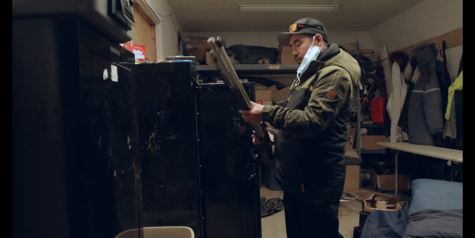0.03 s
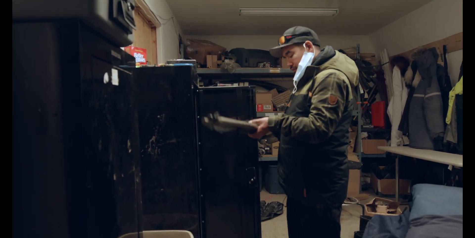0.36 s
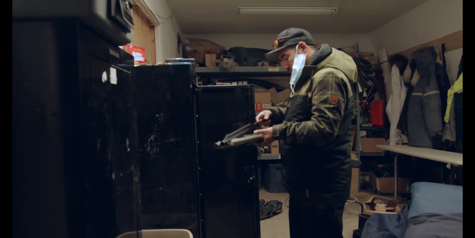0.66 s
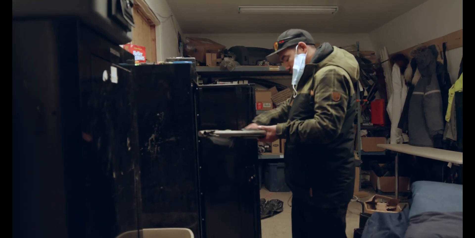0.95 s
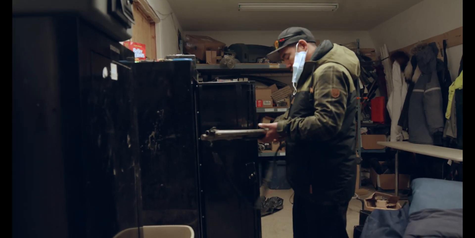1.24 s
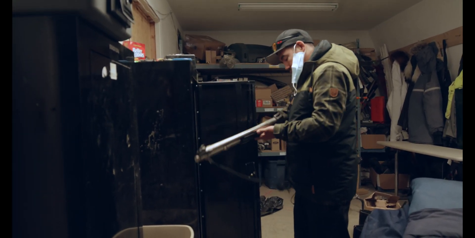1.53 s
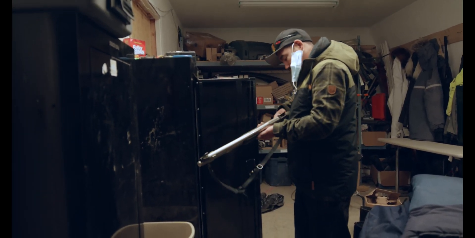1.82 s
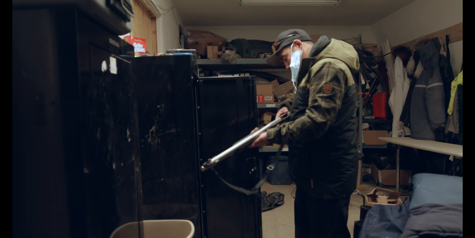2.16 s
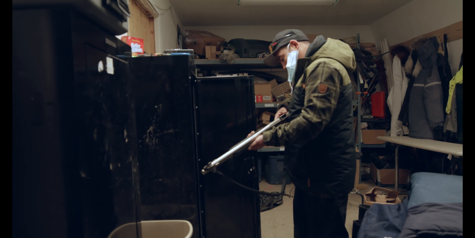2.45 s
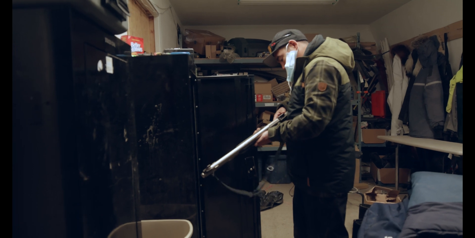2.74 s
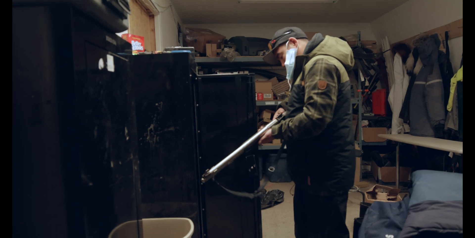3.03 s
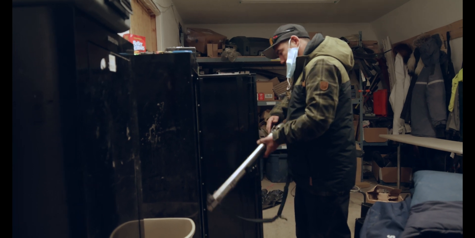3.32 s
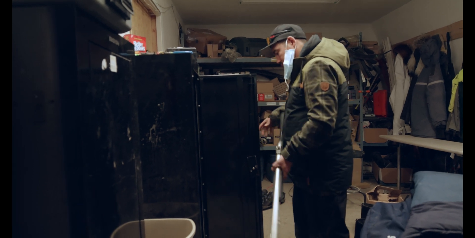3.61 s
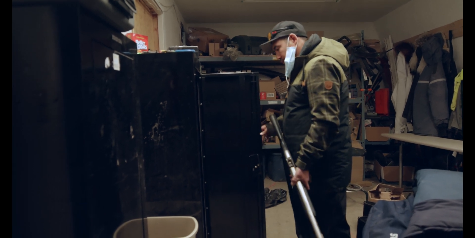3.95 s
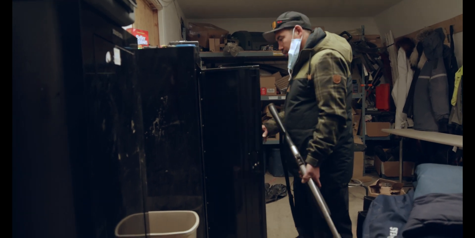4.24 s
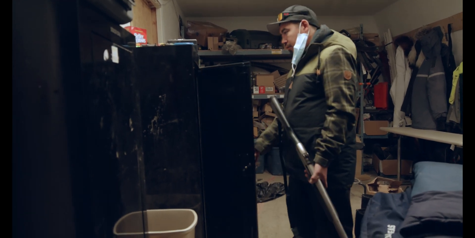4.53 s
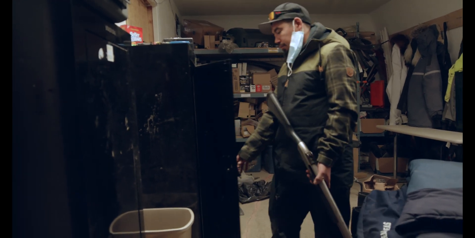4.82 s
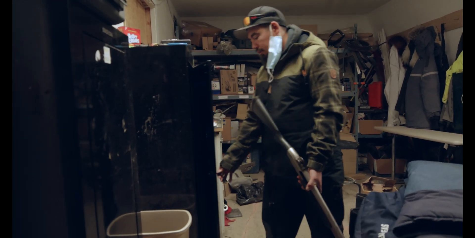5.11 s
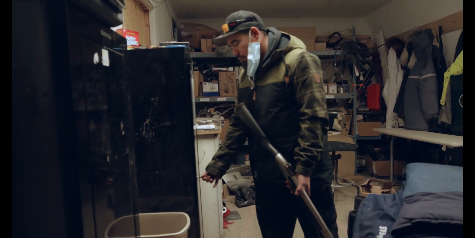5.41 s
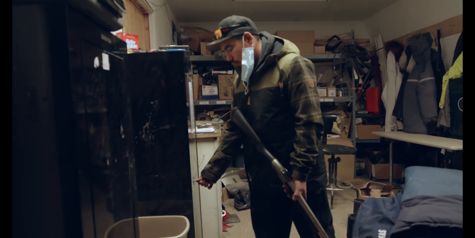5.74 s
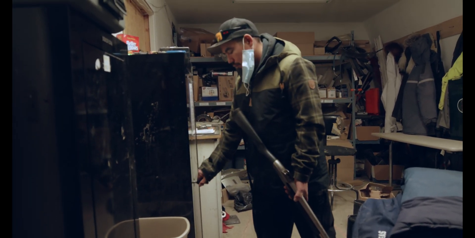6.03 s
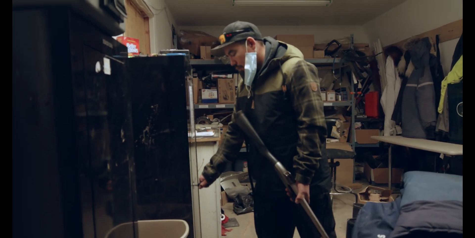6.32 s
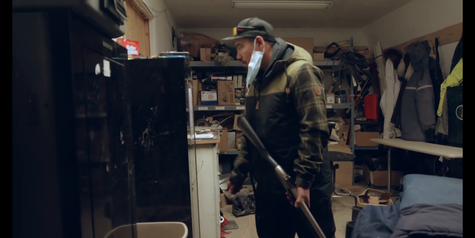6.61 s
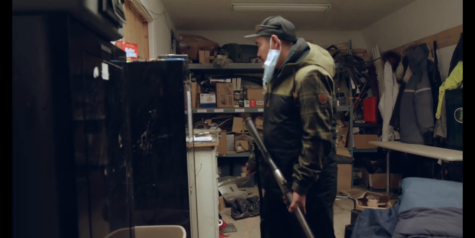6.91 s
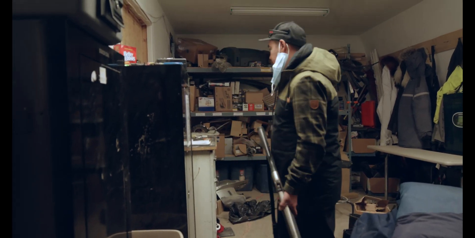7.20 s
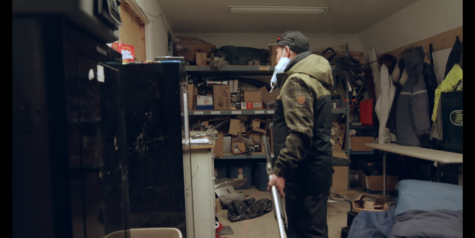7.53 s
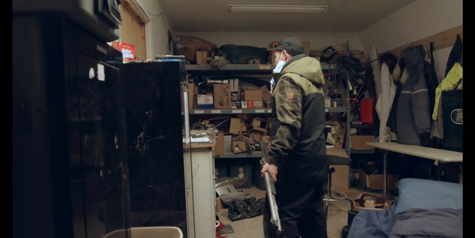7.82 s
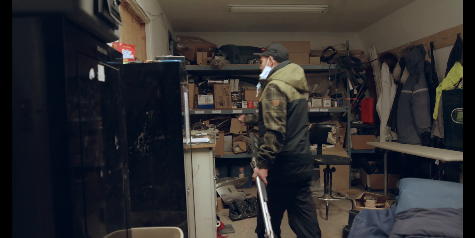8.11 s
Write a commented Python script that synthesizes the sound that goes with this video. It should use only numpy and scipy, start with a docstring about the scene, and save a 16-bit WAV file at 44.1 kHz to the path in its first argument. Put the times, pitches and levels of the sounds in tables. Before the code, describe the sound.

A long gun's action slides and clacks sharply, then a steel safe door rasps and booms over a low machine hum.

```python
"""Machines hum in a small storeroom. A man's jacket rustles, and a long gun taps and knocks as he shifts it.
From 2 s he works the action: steel parts slide, clack against their stops and ring the barrel.
Near 5 s the latch of a steel safe rasps back; the door shudders and booms, its bolts clink, a hinge squeaks.
A few last rustles and knocks follow. One microphone feeds the left channel and overloads on the
hardest clacks."""
import sys
import numpy as np
from scipy import signal
from scipy.fft import rfft, irfft
from scipy.io import wavfile

SR = 44100
rng = np.random.default_rng(int(sys.argv[2]) if len(sys.argv) > 2 else 0)


def wrap_up_sound(samples):
    """Save the sound to the file named by the first command line argument, as 16-bit audio."""
    columns = np.atleast_2d(samples).T
    # keep every value between -1 and 1, then stretch to whole-number steps
    tamed = np.clip(columns, -1, 1)
    steps = np.round(tamed * 32767).astype(np.int16)
    wavfile.write(sys.argv[1], SR, steps)


N = 364266
TIME = np.arange(N) / SR


def from_db(db):
    """Decibels to gain."""
    return 10 ** (np.asarray(db) / 20)


def at_hz(points, hz):
    """Read a curve on a log-frequency axis."""
    f, value = np.transpose(points)
    return np.interp(np.log(np.maximum(hz, 1)), np.log(f), value)


def drift(rate_hz):
    """Random modulation with a spread of about 1."""
    knots = rng.standard_normal(size=4000)
    return np.interp(TIME * rate_hz, np.arange(len(knots)), knots)


def lowpass(x, hz, order=2):
    """Butterworth low-pass."""
    return signal.sosfilt(signal.butter(order, min(hz, .45 * SR), fs=SR, output="sos"), x)


def shaped_click(eq, size=8192):
    """The tightest click with this EQ curve (minimum phase)."""
    log_gain = np.log(from_db(at_hz(eq, np.arange(size // 2 + 1) * SR / size)))
    cepstrum = irfft(log_gain)[:size // 2]
    cepstrum[1:] *= 2
    return irfft(np.exp(rfft(cepstrum, size)))


def coloured(x, eq):
    """Put an EQ curve on a steady sound; rms 1."""
    gain = from_db(at_hz(eq, np.arange(N // 2 + 1) * SR / N))
    shaped = irfft(rfft(x) * gain, N)
    return shaped / np.sqrt(np.mean(shaped ** 2) + 1e-20)


def struck(contacts, modes, eq, grain_db, tick_db, mode_spread_db=2.5):
    """Each contact is a dying burst of tiny impacts that rings the body's modes in a mix of its own."""
    t = TIME[:SR // 2]
    out, click = np.zeros(N + 2 * SR), shaped_click(eq)
    rings = np.zeros((len(modes), len(t)))
    for ring, (hz, mode_db, t60) in zip(rings, modes):
        ring[:] = np.sin(2 * np.pi * hz * t) * from_db(-60 * t / t60)
        ring *= from_db(mode_db) / np.linalg.norm(ring)
    for s, level_db, decay_ms, bright_hz, bass_db in contacts:
        envelope = np.exp(-t[:SR // 5] * 1000 / decay_ms)
        white, grain_size, grit = rng.standard_normal((3, len(envelope)))
        grains = envelope * from_db(grain_db * grain_size)
        chatter = grains * white
        # a heavy part pushes more bass, a soft contact gives less treble, yet some grit always ticks
        burst = chatter + (from_db(bass_db) - 1) * lowpass(chatter, 1000, order=1)
        burst = lowpass(burst, bright_hz) + from_db(tick_db) * grains * grit
        body = from_db(mode_spread_db * rng.standard_normal(len(modes))) @ rings
        body[:len(click)] += click / np.linalg.norm(click)
        hit = signal.fftconvolve(burst, body)
        at = int(s * SR)
        out[at:at + len(hit)] += from_db(level_db) * hit * np.linalg.norm(envelope) / np.linalg.norm(hit)
    return out[:N]


# reverb time by band, before scaling by linger: f/Hz, t60/s
ROOM_DECAY = [(50, 0.56), (200, 0.33), (600, 0.35), (2000, 0.29), (6000, 0.32), (11000, 0.23),
              (16000, 0.16)]


def storeroom(x, wet_db, linger, count=3):
    """Dense reflections off walls and shelves; the treble dies first, the pattern shifts as he moves."""
    t, hz = TIME[:SR], np.arange(SR // 2 + 1)
    white = rfft(rng.standard_normal((count, SR)))
    edges = np.geomspace(20, SR / 2, 14)
    tails = 0
    for low, high in zip(edges, edges[1:]):
        t60 = linger * at_hz(ROOM_DECAY, np.sqrt(low * high))
        band = irfft(white * ((hz >= low) & (hz < high)), SR)
        tails = tails + band * from_db(-60 * t / t60)
    tails *= np.clip((t - .003) / .0011, 0, 1)   # the nearest surfaces answer after a few ms
    tails /= np.linalg.norm(tails, axis=1, keepdims=True)
    sends = np.array([drift(20) for tail in tails])
    sends /= np.linalg.norm(sends, axis=0)
    wet = signal.fftconvolve(x * sends, tails, axes=1)[:, :N].sum(axis=0)
    return x + from_db(wet_db) * wet


# motor harmonics: multiple of the turning rate, relative level/dB
MOTOR_HARMONICS = [(2, -6), (3, -11.5), (4, 0.5)]
# steady machine hum: f/Hz, level/dB
HUM_TONES = [(73.5, -65), (118, -65), (156, -60), (175.5, -51), (240, -54), (273.5, -64), (292, -66),
             (360, -68)]
# ventilation and distant rumble: f/Hz, relative level/dB
AIR_EQ = [(10, 3.5), (19, -4.5), (32, 10), (48, -1), (70, -25.5), (110, -16), (170, 3), (280, -2),
          (450, -4.5), (900, -8), (2000, -22), (5000, -29.5), (10000, -38.5), (15500, -50.5)]


def machines():
    """The bed: a motor slowly gathers speed and fades, wavering with a steady hum over moving air."""
    turns_per_s = (32.7 + .25 * TIME) * (1 + .02 * drift(3))
    turns = np.cumsum(turns_per_s) / SR
    motor_db = -51 - TIME   # fades 1 dB a second
    motor = [(multiple * turns, motor_db + db) for multiple, db in MOTOR_HARMONICS]
    hum = [(hz * TIME, db) for hz, db in HUM_TONES]
    out = from_db(-49.5) * coloured(rng.standard_normal(N), AIR_EQ)
    for cycles, level_db in motor + hum:
        phase = cycles + rng.random() + .04 * drift(3)
        out += np.sqrt(2) * from_db(level_db + 1.9 * drift(7.1)) * np.sin(2 * np.pi * phase)
    return out


# arm moves in the jacket: t/s at the quickest, swish level/dB before makeup gain, half length/s
ARM_MOVES = [(0.235, -61.5, 0.13), (.6, -64.5, 0.092), (1.566, -60, 0.13), (1.74, -67, 0.024),
             (3.247, -60, .05), (3.494, -60.5, 0.17), (4.087, -64, 0.11), (4.39, -66.5, 0.06),
             (4.766, -57.5, 0.035), (5.325, -65.5, 0.34), (6.717, -65, 0.14), (6.976, -65.5, 0.086),
             (7.556, -56, 0.05), (7.757, -62.5, 0.24), (8.176, -52, 0.064)]
# the cloth's dull rub: f/Hz, relative level/dB
RUB_EQ = [(100, -13), (400, 12), (1000, 5.5), (2200, 3.5), (3500, -7), (6000, -26), (15500, -76.5)]
# its airy swish: f/Hz, relative level/dB
SWISH_EQ = [(500, -44.5), (2000, 0.5), (3800, 6.5), (6500, 2), (8500, -2), (11000, -8.5), (15500, -18)]


def jacket(limit_db=-51, makeup_db=3.5):
    """Cloth rubs and swishes in fine uneven grains; each arm move swells over a slight resting stir."""
    move_power = sum(from_db(level_db) ** 2 * np.exp(-((TIME - s) / half_s) ** 2)
                     for s, level_db, half_s in ARM_MOVES)
    out, creases = 0, drift(73)
    for eq, resting_db, move_db in [(RUB_EQ, -62.5, 3), (SWISH_EQ, -75, 0)]:
        level_db = 10 * np.log10(from_db(resting_db) ** 2 + from_db(move_db) ** 2 * move_power)
        grains = rng.standard_normal(N) * from_db(3.2 * rng.standard_normal(N) + 1.45 * creases)
        out = out + from_db(np.minimum(level_db, limit_db) + makeup_db) * coloured(grains, eq)
    return out


# light taps of hand and sling on the steel: t/s, level/dB, chatter decay/ms
TAPS = [(0.147, -49, 16), (.290, -45.5, 5.4), (4.856, -38, 27), (7.314, -45, 2.8)]
# tone of the taps: f/Hz, relative level/dB
TAP_EQ = [(100, -8), (1200, -11.5), (1900, -7), (2350, -1.5), (2900, -16), (6000, -22), (15500, -31)]
# knocks of the stock as the gun is shifted, and one dull rub of the jacket near 4.65 s: t/s, level/dB, chatter
# decay/ms, high cut/Hz
STOCK_KNOCKS = [(0.895, -42, 3, 8000), (0.958, -43, 20, 5000), (.968, -31.5, 36, 6100),
                (1.030, -42.5, 99, 3000), (3.536, -43.5, 15, 1080), (4.651, -46, 75, 1310),
                (8.061, -38, 4.5, 7950), (8.118, -40.5, 21, 890), (8.244, -33.5, 3.4, 6100)]
# tone of the knocks: f/Hz, relative level/dB
KNOCK_EQ = [(15, -12), (80, 3.5), (180, 1.5), (350, 0), (650, -2.5), (1200, 1), (1800, -2.5), (2500, 0),
            (4000, -6.5), (7500, -10), (15500, -25)]


def handling(tap_bright_hz=3150, tap_bass_db=8, knock_bass_db=3.5):
    """Small damped taps and knocks on the gun, with broad resonances only."""
    tap_contacts = [(*tap, tap_bright_hz, tap_bass_db) for tap in TAPS]
    knock_contacts = [(*knock, knock_bass_db) for knock in STOCK_KNOCKS]
    taps = struck(tap_contacts, [], TAP_EQ, grain_db=-3, tick_db=-7)
    knocks = struck(knock_contacts, [], KNOCK_EQ, grain_db=4, tick_db=-17)
    return storeroom(taps + knocks, wet_db=-2.5, linger=1.26)


# parts of the action hit their stops: t/s, level/dB, chatter decay/ms, high cut/Hz
ACTION_CLACKS = [(2.091, -48.5, 11, 9200), (2.119, -42.5, 22, 5000), (2.1345, -28.5, 11, 10800),
                 (2.147, -12, 3.2, 11800), (2.160, -23, 9.2, 12000), (2.208, -15.5, 9.3, 9200),
                 (2.2227, -14.5, 10.7, 9100), (2.259, -13.5, 10.3, 12000), (2.265, -9, 6.2, 16000),
                 (2.563, -32.5, 4.3, 8000), (2.566, -25.5, 4.8, 11200), (2.604, -30, 12.3, 6470),
                 (2.6433, -22, 7.5, 12000), (2.6628, -15.5, 5.1, 7460), (2.683, -17, 4.6, 5000),
                 (2.690, -19.5, 4.8, 10100), (2.952, -15, 5.3, 4940), (3.003, -12.5, 5.5, 11000),
                 (3.0118, -2.5, 8.8, 14800)]
# ring of barrel and receiver: f/Hz, level/dB (energy against the bare click), t60/s
GUN_MODES = [(1260, -20.5, 0.053), (1570, -20, 0.19), (1864, -21.5, 0.11), (2320, -20, .015),
             (3065, -30, 0.02), (3560, -33.5, 0.033), (4350, -25, 0.056), (5470, -41.5, 0.12),
             (6570, -18.5, 0.036), (9560, -27, 0.063), (12000, -34, .13)]
# tone of the clacks: f/Hz, relative level/dB
GUN_EQ = [(20, -20), (70, -29), (170, -24), (340, -12), (700, -4), (1100, -6), (1800, 3), (3800, 3.5),
          (5500, -2.5), (8000, -5), (11000, -7.5), (15500, -13.5)]
# the closing action jolts the stock: t/s, peak level/dB, half length/s
STOCK_JOLTS = [(3.0155, -21, .0015)]


def gun_action(barrel_hz=452, barrel_db=-18, barrel_t60=.75):
    """Steel parts snap together up close; a jolt pushes out a low pulse and sets the barrel humming."""
    clacks, slides = [], []
    for s, level_db, decay_ms, bright_hz in ACTION_CLACKS:
        bass_db = 4.5 - 3.5 * max(11 - decay_ms, 0)   # heavier parts chatter longer and push more bass
        clacks.append((s, level_db, decay_ms, bright_hz, bass_db))
        if level_db > -20:   # a hard-driven part slides softly just before its stop
            slides.append((s - .015, level_db - 22.5, 10, 6500, -9.5))
    sound = struck(clacks + slides, GUN_MODES, GUN_EQ, grain_db=2, tick_db=-13)
    barrel = np.zeros(N)
    for s, peak_db, half_s in STOCK_JOLTS:
        place = np.clip((TIME - s) / half_s, -6, 6)
        sound += from_db(peak_db) * (1 - place ** 2) * np.exp(-place ** 2)
        age = np.maximum(TIME - s, 0)
        ring_db = peak_db + barrel_db - 60 * age / barrel_t60
        barrel += from_db(ring_db) * np.sin(2 * np.pi * barrel_hz * age)
    return barrel + storeroom(sound, wet_db=-8, linger=.88)


# ring of the latch: f/Hz, level/dB (energy against the bare click), t60/s
LATCH_MODES = [(1730, -16, 0.099), (2046, -19, .25), (2400, -21, 0.059)]
# tone of the rasp: f/Hz, relative level/dB
LATCH_EQ = [(60, -33), (150, 2.5), (330, -1), (700, -3.5), (1000, -6.5), (1900, -5), (3800, -10),
            (6000, -14.5), (10000, -21.5), (15500, -24)]


def latch(start_s=4.939, length_s=.09, decay_ms=13.5, bright_hz=6200, bass_db=-2):
    """The bolts rasp back in a quick run of slips: a soft one, then even ones at widening gaps."""
    times = start_s + length_s * np.linspace(0, 1, 7) ** 1.3
    slips = [(s, -28.5 if k else -33, decay_ms, bright_hz, bass_db) for k, s in enumerate(times)]
    rasp = struck(slips, LATCH_MODES, LATCH_EQ, grain_db=6, tick_db=-19)
    return storeroom(rasp, wet_db=-5, linger=.89)


# the door shudders: t/s, first level/dB, swell/dB, push length/s, high cut/Hz, bass shelf/dB
DOOR_SHUDDERS = [(5.6188, -26.5, 4, 0.098, 4300, -1), (5.834, -36.5, 3.5, 0.045, 2260, -38),
                 (5.990, -31.5, 2.5, 0.055, 3700, -7), (6.221, -35, -3.5, 0.0082, 4100, 10),
                 (6.356, -34, 5.5, 0.12, 3600, 0)]


def shudder_blows(count=12, gap_s=.026, decay_ms=22, settle_db_per_s=141, dulling_octaves_per_s=17):
    """Uneven runs of blows that ramp in level while the door is pushed, then die away and grow duller."""
    blows = []
    for s, first_db, swell_db, push_s, bright_hz, bass_db in DOOR_SHUDDERS:
        ages = gap_s * (np.arange(count) + rng.uniform(-.15, .15, count))
        for age in ages - ages[0]:
            settling_s = max(age - push_s, 0)
            level_db = first_db + swell_db * min(age / push_s, 1) - settle_db_per_s * settling_s
            dulled_hz = bright_hz / 2 ** (dulling_octaves_per_s * settling_s)
            blows.append((s + age, level_db, decay_ms, dulled_hz, bass_db))
    return blows


# loose bolts clink in the door: t/s, level/dB, chatter decay/ms
BOLT_CLINKS = [(5.619, -35, 35), (5.671, -24, 9.2), (6.028, -37.5, 9.8), (6.222, -48.5, 8),
               (6.383, -44, 25), (6.416, -35, 30), (6.493, -37, 6.5)]
# the heavy door thuds as it starts and stops, then a dull rub of the jacket near 6.70 s: t/s, level/dB, chatter
# decay/ms, high cut/Hz
DOOR_THUDS = [(5.619, -24, 44, 600), (6.443, -25.5, 26, 446), (6.596, -34.5, 41, 129),
              (6.703, -39.5, 45, 1800)]
# ring of the steel panels: f/Hz, level/dB (energy against the bare click), t60/s
PANEL_MODES = [(70.2, -21, 0.68), (92.7, -17, 0.8), (159, -13, 0.096), (250, -34, 0.45), (307, -33, 0.37),
               (413.3, -16.5, 0.71), (585, -34, 0.74), (748, -18, 0.14), (885, -28, 0.23),
               (1094, -29, 0.33), (1470, -33, 0.26), (1910, -44, 0.31)]
# tone of the boom: f/Hz, relative level/dB
SAFE_EQ = [(15, -16), (45, -4.5), (80, 2), (120, 0), (170, 7.5), (250, 3), (400, -1.5), (750, -2),
           (1400, -10), (2800, -14.5), (6000, -19.5), (11000, -23.5), (15500, -30)]


def safe_door(clink_bright_hz=9900, clink_bass_db=-15, thud_bass_db=4):
    """Clinks, thuds and shudders set the panels booming, and the hollow cabinet prolongs them."""
    clinks = [(*clink, clink_bright_hz, clink_bass_db) for clink in BOLT_CLINKS]
    thuds = [(*thud, thud_bass_db) for thud in DOOR_THUDS]
    boom = struck(clinks + thuds + shudder_blows(), PANEL_MODES, SAFE_EQ, grain_db=3, tick_db=-33)
    return storeroom(boom, wet_db=-1.5, linger=1.4)


# hinge squeaks: t/s at the loudest, level/dB, half length/s, f/Hz
HINGE_SQUEAKS = [(5.9, -43, 0.0084, 5380), (5.999, -34, 0.0057, 5460)]


def hinge():
    """Dry steel sticks and slips in short chirps that rise a little."""
    out = np.zeros(N)
    for s, level_db, half_s, hz in HINGE_SQUEAKS:
        place = np.clip((TIME - s) / half_s, -6, 6)
        pitch = hz * (1 + .012 * place + .006 * drift(400))
        out += from_db(level_db) * np.exp(-place ** 2) * np.sin(2 * np.pi * np.cumsum(pitch) / SR)
    return storeroom(out, wet_db=-9, linger=.9)


def scene():
    """Everything reaches one microphone on the left channel."""
    left = gun_action() + safe_door() + latch() + handling() + hinge() + jacket() + machines()
    return np.array([left, np.zeros(N)])


def record(dry, gain_db=5, ceiling_db=-4.3, cutoff_hz=16000):
    """The preamplifier overloads on the hardest clacks and rounds them off; the top is cut steeply."""
    driven = dry * from_db(gain_db)
    rounded = driven / (1 + (driven / from_db(ceiling_db)) ** 4) ** (1 / 4)
    high_cut = signal.ellip(12, .1, 90, cutoff_hz, fs=SR, output="sos")
    return signal.sosfilt(high_cut, rounded)


dry = scene()
out = record(dry)
wrap_up_sound(out)
```